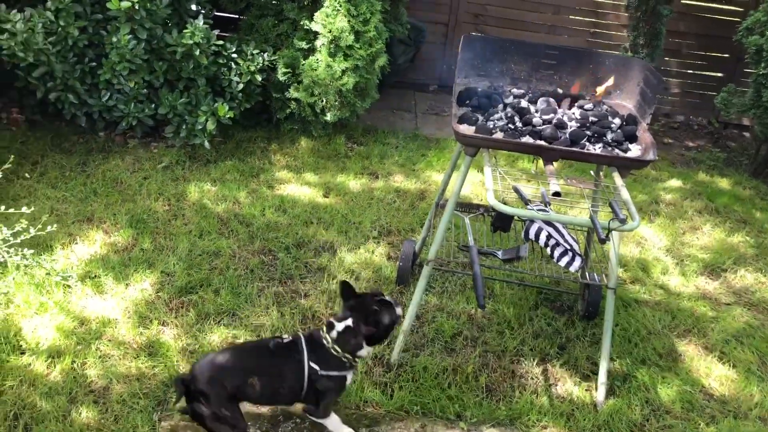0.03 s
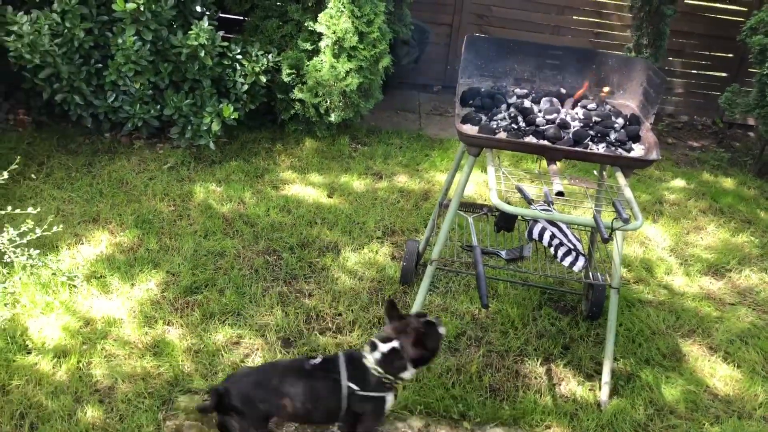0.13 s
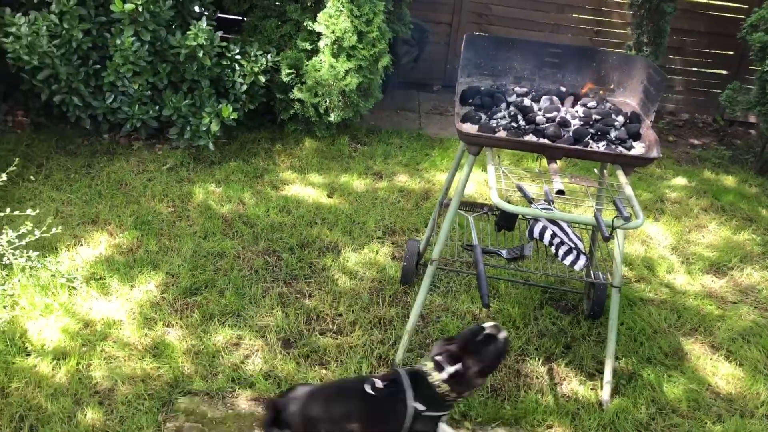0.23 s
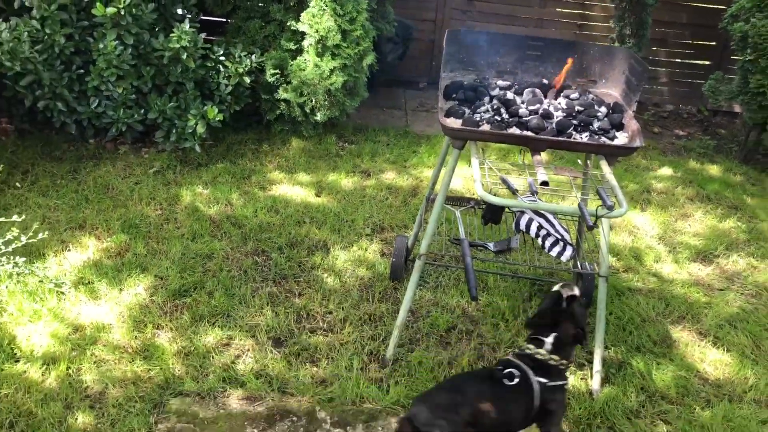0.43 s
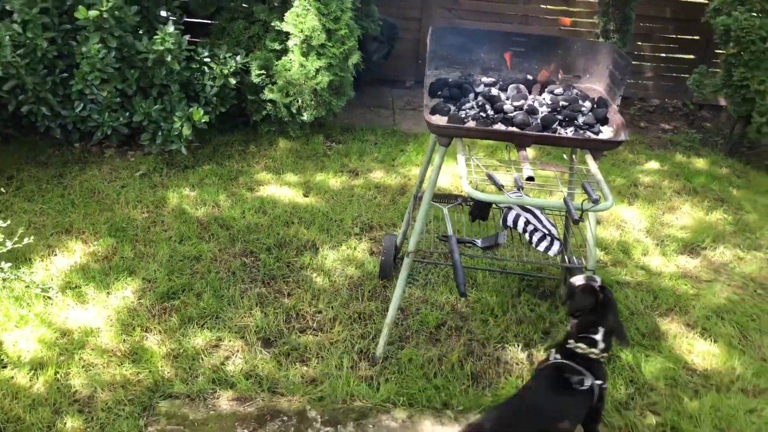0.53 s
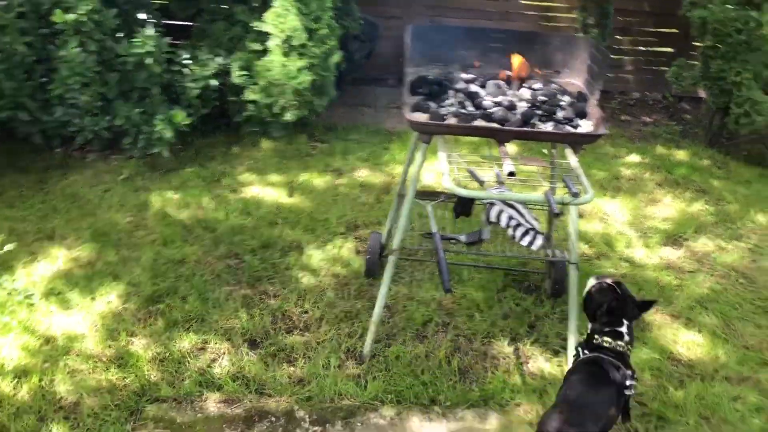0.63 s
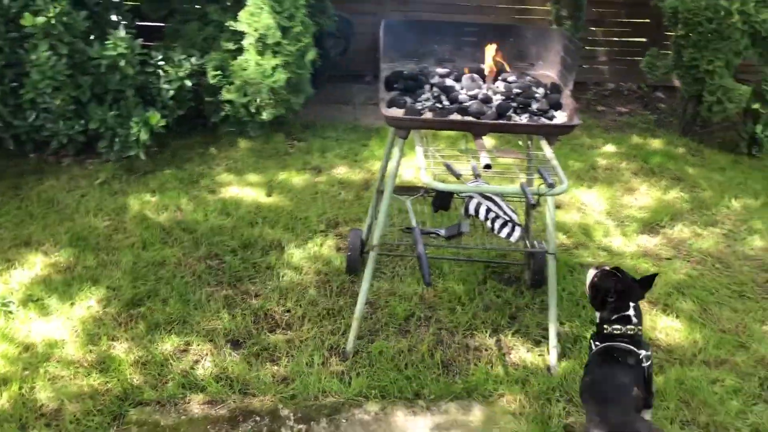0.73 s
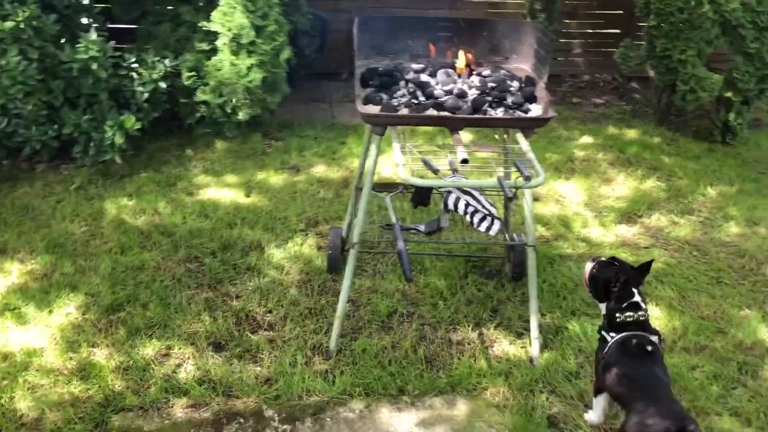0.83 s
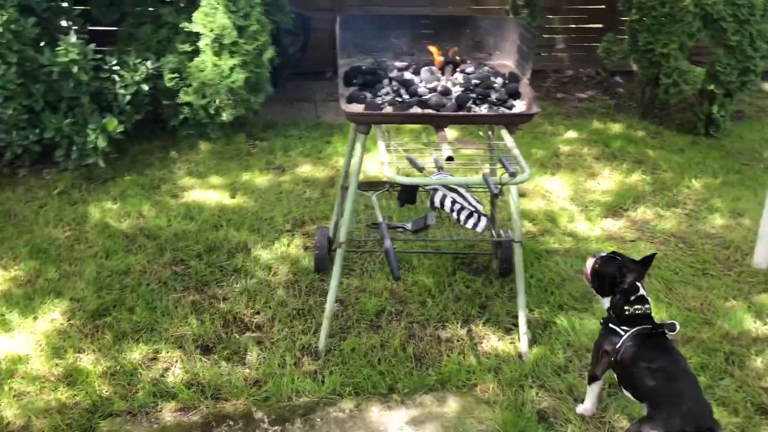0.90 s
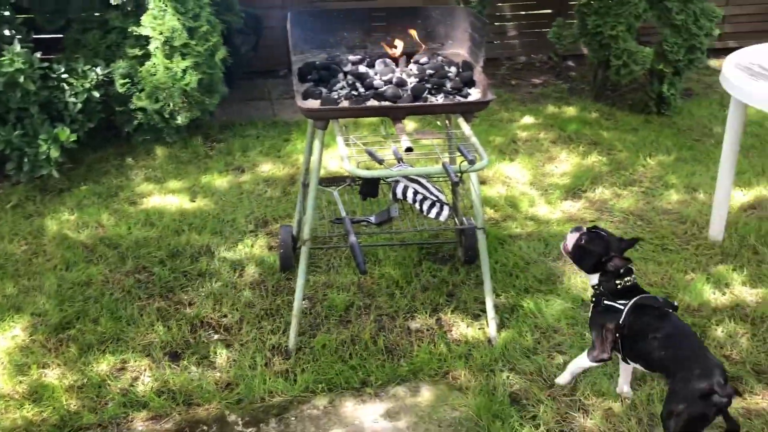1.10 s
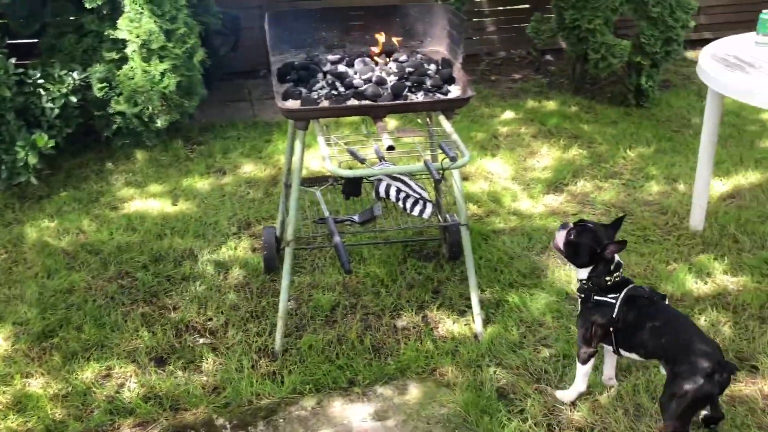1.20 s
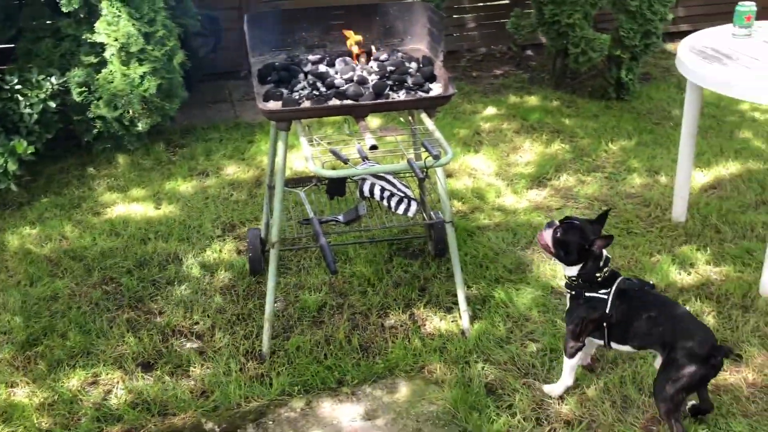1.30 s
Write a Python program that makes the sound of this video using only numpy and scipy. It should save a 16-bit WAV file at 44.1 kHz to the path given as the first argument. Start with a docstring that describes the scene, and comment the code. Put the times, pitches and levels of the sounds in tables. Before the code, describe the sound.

A small dog barks close by in a garden. It pants softly at the start with a lip smack and a bright charcoal tick. At 0.22 s a loud rough yelp breaks out, its squeal swooping down, then rising into a second bark until 0.63 s. Paws brush grass near 0.72 s, panting returns at 0.82 s, and a hoarse, whistling snarl-bark sounds at 1.03-1.2 s. Short outdoor tail, quiet air, low hum.

```python
"""A dog pants on a lawn beside ticking charcoal, then barks three times, close by.
The first two barks run together: rough noise from the throat under a squeal that swoops down and up.
Then paws brush the grass and the dog pants again; the third bark is a hoarse snarl with a thin whistle.
Barks, breath and lip smacks, paws and charcoal are shaped noise and gliding tones.
A short scattered tail blends with them; quiet air and a low hum lie under everything."""
import sys
import numpy as np
from scipy import signal
from scipy.fft import rfft, irfft, next_fast_len
from scipy.io import wavfile
from scipy.ndimage import uniform_filter1d

SR = 44100
rng = np.random.default_rng(int(sys.argv[2]) if len(sys.argv) > 2 else 0)


def wav_record(signal):
    """Record a signal, one row per channel, as 16-bit PCM in the file named by sys.argv[1]."""
    frames = np.transpose(np.atleast_2d(signal))
    bounded = np.clip(frames, -1, 1)
    # unit amplitude maps onto the largest positive 16-bit level
    quanta = np.round(bounded * 32767).astype(np.int16)
    wavfile.write(sys.argv[1], SR, quanta)


N = 59535
T = np.arange(N) / SR   # time of each sample [s]
CUTOFF_HZ = 15900   # nothing is kept above this


def barks():
    """Two yelping barks and a snarl: rough throat noise, patchy in the treble, plus clear squeals."""
    slaps, puffs = folds()
    rough_sound = first_bark(slaps, puffs) + second_bark(slaps, puffs) + snarl(slaps, puffs)
    return patchy(rough_sound, 3140, 15300, spread_db=5, rate=18.5) + squeals(puffs)


def first_bark(slaps, puffs):
    """Throat noise, with a short burst of bright noise as the hard edge when the bark breaks out."""
    # loudness and brightness of the voice: (time [s], level before the treble change [dB], treble [dB])
    voice_curve = [(.215, -60, 3), (.229, -20.5, -7.5), (.242, -13.5, -7), (.272, -11.5, 1.5),
                   (.308, -7.5, -12.5), (.328, -15.5, -8.5), (.355, -12, -27), (.385, -52, 21.5),
                   (.44, -66.5, 26)]
    # how strongly the throat passes each pitch: (frequency [Hz], relative level [dB])
    throat = [(150, -41), (270, -14), (370, -33.5), (500, -6), (790, -4), (920, -8), (1200, 1.5), (1520, 6),
              (1750, -13.5), (2050, 1.5), (2400, -15.5), (2870, -18), (3300, -25), (4300, -25),
              (6300, -22.5), (11000, -33.5), (15500, -49)]
    # colour of the hard edge: (frequency [Hz], relative level [dB])
    bite_colour = [(1500, -49.5), (2400, 5), (2900, 8.5), (3250, -5), (3600, -0.5), (4300, -5.5),
                   (6000, -11.5), (9000, -45)]
    bite_s, bite_db, rise_s, fall_s = 0.2438, -19, 0.0062, 0.019
    bite = from_db(bite_db) * swell(bite_s, rise_s, fall_s) * noise(bite_colour)
    return rasp(voice_curve, throat, slaps, puffs, slap_db=-12.5, rough=0.2) + bite


def second_bark(slaps, puffs):
    """Throat noise, two gliding mouth resonances and a brief wet hiss as the jaws open."""
    # loudness and brightness of the voice: (time [s], level before the treble change [dB], treble [dB])
    voice_curve = [(.44, -49, 17), (.476, -25.5, 4.5), (.51, -12.5, -8), (.546, -14.5, 5), (.59, -16, 2.5),
                   (.607, -19, -3.5), (.64, -52, -9)]
    # how strongly the throat passes each pitch: (frequency [Hz], relative level [dB])
    throat = [(150, -31), (250, -16), (350, -21), (440, 0), (540, -4), (680, -0.5), (1100, 5), (1540, -0.5),
              (1750, -15), (2320, -16.5), (3200, -25.5), (4500, -34.5), (6300, -33), (7500, -30),
              (11000, -37.5), (15500, -51)]
    # the lower and the higher mouth resonance: (time [s], frequency [Hz], level [dB])
    mouth_low = [(.46, 2730, -69), (.479, 2680, -30.5), (.501, 2200, -34.5), (.539, 2320, -20),
                 (.557, 2600, -31.5), (.58, 2550, -27), (.625, 2400, -47)]
    mouth_high = [(.455, 5890, -58), (.5, 5426, -45), (.54, 5550, -42.5), (.553, 6420, -38.5),
                  (.585, 6410, -40.5), (.61, 6320, -49)]
    # colour of the wet hiss: (frequency [Hz], relative level [dB])
    spit_colour = [(4500, -27), (7800, 8), (8900, -15), (10200, 4), (14000, -25)]
    spit_s, spit_db, rise_s, fall_s = .547, -39, .01, .004
    spit = from_db(spit_db) * swell(spit_s, rise_s, fall_s) * noise(spit_colour)
    voice = rasp(voice_curve, throat, slaps, puffs, slap_db=-6.5, rough=0.25)
    low = mouth(mouth_low, puffs, width_hz=266, rough=0.45)
    high = mouth(mouth_high, puffs, width_hz=380, rough=0.6)
    return voice + spit + low + high


def snarl(slaps, puffs):
    """Hoarse throat noise with one mouth resonance that slides down."""
    # loudness and brightness of the voice: (time [s], level before the treble change [dB], treble [dB])
    voice_curve = [(1.012, -59, -12), (1.022, -32.5, -26), (1.049, -18.5, -26.5), (1.058, -14, -19),
                   (1.07, -17.5, -11.5), (1.083, -13, -6), (1.118, -15, 2), (1.158, -18, 4.5),
                   (1.187, -16, -0.5), (1.205, -32, 8.5), (1.25, -37, 2)]
    # how strongly the throat passes each pitch: (frequency [Hz], relative level [dB])
    throat = [(190, -19), (350, -26.5), (520, -15.5), (780, -5), (1050, -12), (1350, -2), (1750, -1.5),
              (2020, -2), (2350, -8), (2850, -7), (3350, -9.5), (4000, -14.5), (5300, -20), (7000, -28),
              (11000, -36), (15500, -49)]
    # the mouth resonance: (time [s], frequency [Hz], level [dB])
    mouth_glide = [(1.04, 2036, -55), (1.06, 2050, -28), (1.11, 1982, -31), (1.16, 1839, -17.5),
                   (1.19, 1730, -35), (1.35, 1720, -55)]
    voice = rasp(voice_curve, throat, slaps, puffs, slap_db=-11.5, rough=0.11)
    return voice + mouth(mouth_glide, puffs, width_hz=230, rough=0.36)


def squeals(puffs):
    """The gliding tones of all three barks."""
    # squeal of the first bark, of the second, and the thin whistle in the snarl:
    # (time [s], pitch [Hz], level before breaking up [dB], roughness [0-1])
    first = [(.217, 1330, -58, 0.16), (.231, 1297, -28.5, 0), (.247, 1361, -4, 0.62),
             (.255, 1410, -14.5, 0.91), (.282, 1267, -11.5, 0.35), (.297, 1090, -8.5, 0.52),
             (.309, 800.4, -12, 0.93), (.322, 519.6, -13.5, 0.15), (.338, 460, -30.5, 0)]
    second = [(0.357, 480, -37, 0.61), (.369, 579.8, -19, 0.74), (.382, 830, -23, 0.59),
              (.394, 1209, -21, 0.14), (.407, 1236, -35, .2), (.423, 1290, -27, 0.21),
              (.438, 1219, -38.5, .3), (.451, 1100, -18, .15), (0.462, 979.6, -28, 1),
              (.474, 762.8, -21, 0.74), (0.498, 667.9, -15.5, 0.42), (.522, 804.7, -16.5, .9),
              (.538, 1077, -15.5, 0.89), (.562, 990, -7, 0.15), (0.585, 916.7, -9.5, 0.75),
              (0.605, 756.6, -21, 0.92), (0.631, 730, -43, 0.91)]
    whistle = [(1.032, 1346, -40, 0.39), (1.061, 1389, -20, 0.88), (1.084, 1450, -36, 0.65),
               (1.123, 1432, -18.5, 0.05), (1.159, 1435, -13.5, 0.2), (1.184, 1391, -23.5, 0.48)]
    return sum(squeal(rows, puffs, shake=0.3, jitter=0.0745, second_db=-24.5, break_db=3.5)
               for rows in (first, second, whistle))


def squeal(rows, puffs, shake, jitter, second_db, break_db):
    """A high gliding tone; when rough it wavers, breaks up and splits into strands beside its pitch."""
    strand_hz, strand_rate_hz = 190, 62   # distance from the pitch; how fast strands come and go
    strand_share = .3
    lowest_hz = 385   # the part below this is taken out
    s, hz, db, rough = np.transpose(rows)
    rough = np.clip(np.interp(T, s, rough), 0, 1)
    pitch = np.interp(T, s, hz) * (1 + jitter * rough * drift(210))
    phase = 2 * np.pi * np.cumsum(pitch) / SR
    offset = 2 * np.pi * strand_hz * T
    upper = drift(strand_rate_hz) * np.sin(phase + offset)
    lower = drift(strand_rate_hz) * np.sin(phase - offset)
    overtone = from_db(second_db) * np.sin(2 * phase)
    tone = np.sin(phase) + strand_share * rough * (upper + lower) + overtone
    shaken = tone * (1 - rough + shake * rough * puffs)
    breaks = from_db(break_db * rough * np.tanh(drift(strand_rate_hz)))
    voice = level(rows, db) * even(shaken) * breaks
    return voice - below(voice, lowest_hz)


def rasp(rows, throat, slaps, puffs, slap_db, rough):
    """Slaps and puffed air ring in the throat; middle and treble rise as the mouth opens."""
    middle_hz, treble_hz = 1040, 2130   # where the middle and the treble begin
    middle_share = 0.7   # the middle changes by this share of the treble's decibels
    s, db, treble_db = np.transpose(rows)
    breath = rms_one(rng.standard_normal(N) * (1 + rough * puffs))
    source = from_db(slap_db) * slaps + breath
    spectrum = [(40, -79)] + list(throat)   # almost nothing in the deep bass
    voice = even(colour(source, spectrum), size=500)
    low = below(voice, middle_hz)
    dull = below(voice, treble_hz)
    opening = np.interp(T, s, treble_db)
    middle = (dull - low) * from_db(middle_share * opening)
    treble = (voice - dull) * from_db(opening)
    return level(rows, db) * (low + middle + treble)


def mouth(rows, puffs, width_hz, rough):
    """Puffed air in one gliding resonance: slow noise moved up to the gliding frequency."""
    s, hz, db = np.transpose(rows)
    phase = 2 * np.pi * np.cumsum(np.interp(T, s, hz)) / SR
    smooth = signal.butter(2, width_hz / 2, fs=SR, output="sos")
    a, b = signal.sosfilt(smooth, rng.standard_normal((2, N)))
    band = a * np.sin(phase) + b * np.cos(phase)
    return level(rows, db) * even(band * (1 + rough * puffs))


def folds(count=400):
    """Uneven slaps of the vocal folds, and the puff of air that follows each."""
    slaps_per_s, gap_jitter = 140, .3   # typical rate; unevenness of the gaps, as a natural log
    puff_s, spread_db = 0.003, 2.5   # average lag of the puffed air; spread of the slap strengths
    gap, size = rng.standard_normal((count, 2)).T
    at = (np.cumsum(np.exp(gap_jitter * gap)) / slaps_per_s * SR).astype(int)
    inside = at < N
    slaps = np.zeros(N)
    slaps[at[inside]] = from_db(spread_db * size[inside])
    r = np.exp(-2 / (puff_s * SR))
    puffs = signal.lfilter([1], [1, -2 * r, r * r], slaps)
    return rms_one(slaps), even(puffs)


def pants():
    """The dog draws air through its muzzle, heard as patchy coloured noise, and smacks its lips."""
    # loudness of each pant, one list per pant: (time [s], level [dB])
    pant_curves = [
        [(0, -46), (.027, -45), (.05, -42.5), (.09, -51.5), (.14, -58), (.17, -90)],
        [(.82, -56), (.865, -46.5), (.92, -51), (.98, -50.5), (1.005, -57)],
    ]
    # colour of the air in the muzzle: (frequency [Hz], relative level [dB])
    muzzle = [(200, -13), (500, -15), (700, -13), (800, -13), (930, 3.5), (1120, -20), (1400, 4.5),
              (1650, -10), (1950, 0), (2250, -9), (3500, -16), (4700, -17), (6200, -29), (8200, -26.5),
              (15500, -65)]
    # lip smacks: (time [s], level [dB])
    smack_times = [(0.023, -37), (.911, -44)]
    # colour of the smacks: (frequency [Hz], relative level [dB])
    lips = [(300, -14), (700, 1.5), (1350, 0.5), (2200, -11.5), (9000, -34)]
    smack_s = .002   # rise and fall of a smack
    air = rms_one(patchy(noise(muzzle), 740, 4100, spread_db=5, rate=20, count=6))
    loudness = sum(level(rows, np.array(rows)[:, 1]) for rows in pant_curves)
    smacks = sum(from_db(db) * swell(s, smack_s, smack_s) for s, db in smack_times)
    return air * loudness + smacks * noise(lips)


def paws():
    """Soft thuds on the turf, each a very short low tone, and one brush of noise through the grass."""
    # paws land: (time [s], level of the tone before its swell [dB], pitch [Hz])
    landings = [(0.174, -43, 79), (0.659, -41, 74.8), (1.187, -29, 185)]
    # colour of the brushed grass: (frequency [Hz], relative level [dB])
    grass = [(200, -38), (900, 5), (1800, -0.5), (3000, -11), (5500, -13.5), (9000, -25.5), (15500, -36)]
    thud_s = 0.007   # rise and fall of a thud
    scuff_s, scuff_db, rise_s, fall_s = 0.7206, -37, 0.015, 0.037
    thuds = sum(from_db(db) * swell(s, thud_s, thud_s) * np.sin(2 * np.pi * hz * (T - s))
                for s, db, hz in landings)
    scuff = from_db(scuff_db) * swell(scuff_s, rise_s, fall_s) * noise(grass)
    return thuds + scuff


def charcoal():
    """Tiny bright cracks: noise that starts at once, dies away fast and keeps only a high band."""
    # ticks: (time [s], starting level before halving and filtering [dB])
    ticks = [(0.0442, -18.5), (.1662, -44), (.833, -40)]
    decay_s, low_hz, top_hz = 0.0011, 2200, 9600
    bursts = sum(from_db(db) * (T >= s) * np.exp(-np.abs(T - s) / decay_s) for s, db in ticks)
    cracks = rng.standard_normal(N) / 2 * bursts
    band = signal.butter(2, [low_hz, min(top_hz, CUTOFF_HZ)], "band", fs=SR, output="sos")
    return signal.sosfilt(band, cracks + 1e-18)


def garden(x):
    """Two faint, very short echoes blend with the sound; a scattered tail dies band by band."""
    # faint early echoes: (delay [s], level [dB])
    echo_list = [(.0042, -21.5), (0.0136, -15.5)]
    # how long the tail takes to fall by 60 dB: (frequency [Hz], time [s])
    tail_t60 = [(200, 0.65), (480, 0.31), (1300, 0.31), (2500, 0.42), (15000, 0.47)]
    tail_db, onset_s = -12, 0.0061
    edges = np.geomspace(100, 16000, 9)   # borders of the bands [Hz]
    tail = 0
    for low, high in zip(edges, edges[1:]):
        sos = signal.butter(2, [low, high], "band", fs=SR, output="sos")
        band = signal.sosfilt(sos, rng.standard_normal(N))
        tail = tail + band * from_db(-60 * T / at_hz(tail_t60, np.sqrt(low * high)))
    tail = tail * (1 - np.exp(-(T / onset_s) ** 2))   # the tail builds up softly
    tail = tail / np.linalg.norm(tail)
    scattered = from_db(tail_db) * signal.fftconvolve(x, tail)[:N]
    echoes = sum(from_db(db) * np.interp(T - s, T, x, left=0) for s, db in echo_list)
    return x + echoes + yard_ring(x) + scattered


def yard_ring(x):
    """Narrow resonances that go on sounding after each bark."""
    # resonances that linger in the yard: (frequency [Hz], gain [dB])
    modes = [(694, 1.5), (797, -5), (1114, -0.5), (1720, 6), (1939, 4), (2868, 0.5), (3320, 7.5)]
    t60_s = 0.18   # time to fall by 60 dB
    r = from_db(-60 / (t60_s * SR))
    b = (1 - r * r) / 2 * np.array([1, 0, -1])
    ringing = 0
    for hz, db in modes:
        a = [1, -2 * r * np.cos(2 * np.pi * hz / SR), r * r]
        ringing = ringing + from_db(db) * signal.lfilter(b, a, x)
    return ringing


def background():
    """Quiet outdoor air as coloured noise, with a low hum whose pitch wavers."""
    # colour of the air: (frequency [Hz], relative level [dB])
    air_colour = [(30, -28), (45, -11), (80, -8.5), (130, -3.5), (200, -7), (350, -19), (700, -16),
                  (2000, -28), (4000, -32.5), (8000, -41.5), (15500, -40)]
    air_db, hum_db, hum_hz = -52, -58, 81
    pitch = hum_hz * (1 + 0.013 * drift(1.7))
    hum = np.sin(2 * np.pi * np.cumsum(pitch) / SR)
    return from_db(air_db) * noise(air_colour) + from_db(hum_db) * rms_one(hum)


def from_db(db):
    """Decibels to gain."""
    return 10 ** (np.asarray(db) / 20)


def rms_one(x):
    """Scale to unit power."""
    return x / np.sqrt(np.mean(x ** 2) + 1e-20)


def even(x, size=700):
    """Hold the short-term power at 1, over a window of so many samples."""
    return x / np.sqrt(np.abs(uniform_filter1d(x ** 2, size)) + 1e-9)


def level(rows, db):
    """Gain along a level curve, silent outside it."""
    return from_db(np.interp(T, np.array(rows)[:, 0], db, left=-np.inf, right=-np.inf))


def swell(s, rise, fall):
    """A smooth bell-shaped rise and fall around one moment."""
    return np.exp(-((T - s) / np.where(T < s, rise, fall)) ** 2 / 2)


def at_hz(points, hz):
    """Read a table on a log-frequency axis."""
    f, v = np.transpose(points)
    return np.interp(np.log(np.maximum(hz, 1)), np.log(f), v)


def colour(x, spectrum, size=8000):
    """Filter with the given spectrum that never sounds ahead of its input (minimum phase); unit power."""
    size = 2 * next_fast_len((N + size) // 2, True)   # spare room for the filter to ring out
    gain = from_db(at_hz(spectrum, np.fft.rfftfreq(size, 1 / SR)))
    cepstrum = irfft(np.log(gain))
    # folding the second half onto the first makes the filter minimum phase
    cepstrum[1:size // 2] *= 2
    cepstrum[size // 2 + 1:] = 0
    return rms_one(irfft(rfft(x, size) * np.exp(rfft(cepstrum)))[:N])


def noise(spectrum):
    """Coloured noise of unit power."""
    return colour(rng.standard_normal(N), spectrum)


def drift(rate, size=8000):
    """Smooth chance movement with spread 1 at a rate in Hz, after a run-in of so many samples."""
    r = np.exp(-2 * np.pi * rate / SR)
    wander = signal.lfilter([1], [1, -2 * r, r * r], rng.standard_normal(N + size))
    return rms_one(wander[size:])


def below(x, hz):
    """The part of a sound under a crossover."""
    return signal.sosfiltfilt(signal.butter(5, hz, fs=SR, output="sos"), x + 1e-18)


def patchy(x, from_hz, to_hz, spread_db, rate, count=9):
    """Neighbouring bands swell and fade, each on its own."""
    out = under = below(x, from_hz)
    for hz in np.geomspace(from_hz, min(to_hz, CUTOFF_HZ), count)[1:]:
        wider = below(x, hz)
        out = out + (wider - under) * from_db(spread_db * np.tanh(drift(rate)))
        under = wider
    return out + x - under


def scene():
    """Dog and charcoal heard in the garden, over the background."""
    sources = barks() + pants() + paws() + charcoal()
    return (garden(sources) + background())[None]


def record(dry):
    """The loudest peaks are rounded off and the top is cut."""
    rounded = dry / (1 + dry ** 6) ** (1 / 6)
    return signal.sosfilt(signal.ellip(10, .1, 80, CUTOFF_HZ, fs=SR, output="sos"), rounded)


dry = scene()
out = record(dry)
wav_record(out)
```